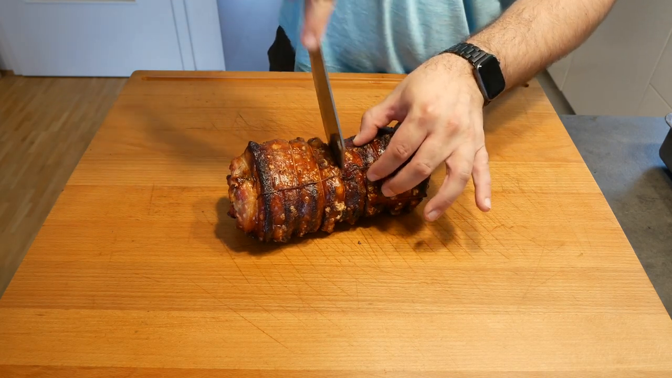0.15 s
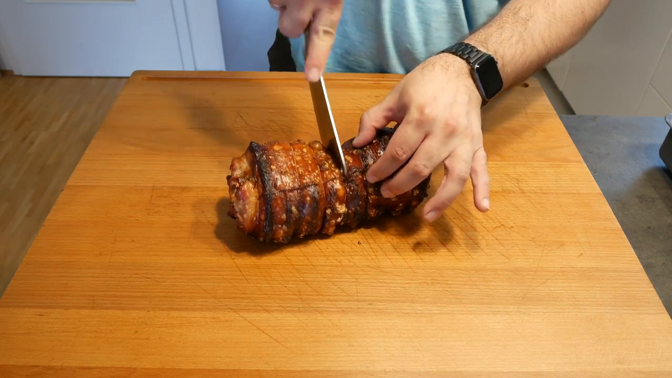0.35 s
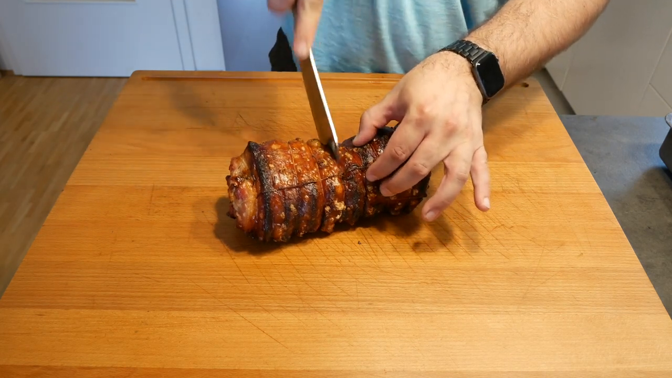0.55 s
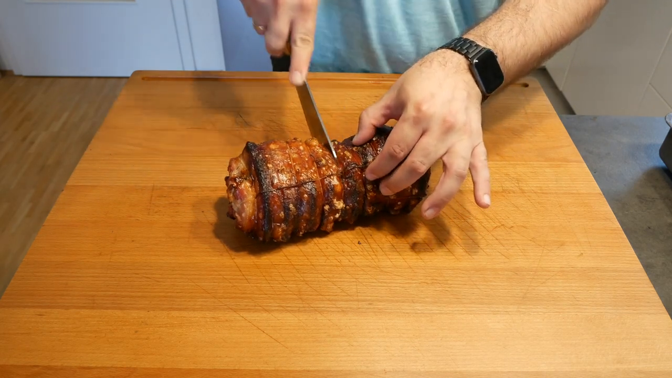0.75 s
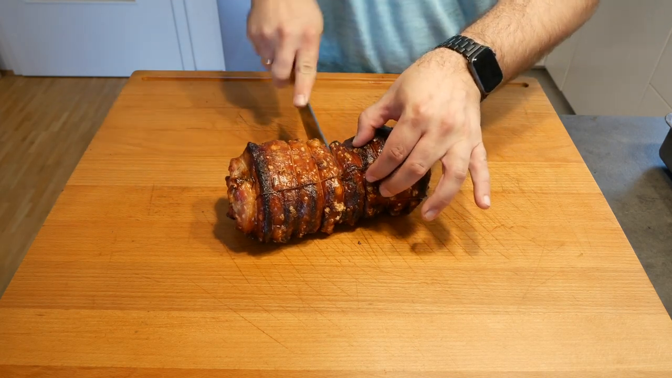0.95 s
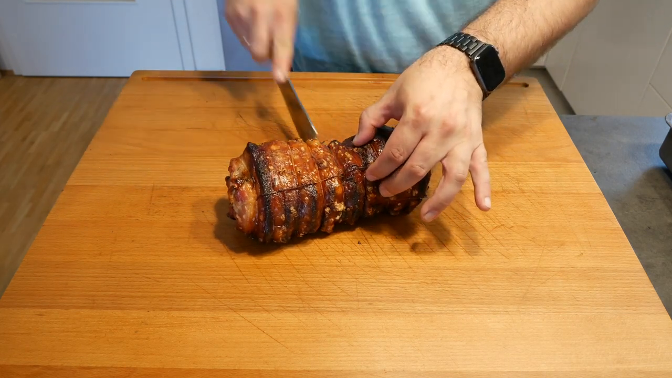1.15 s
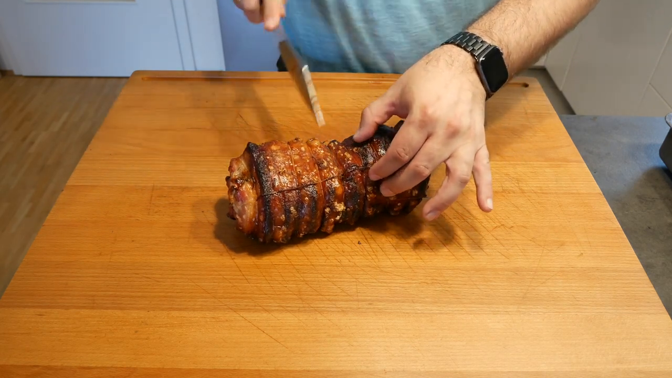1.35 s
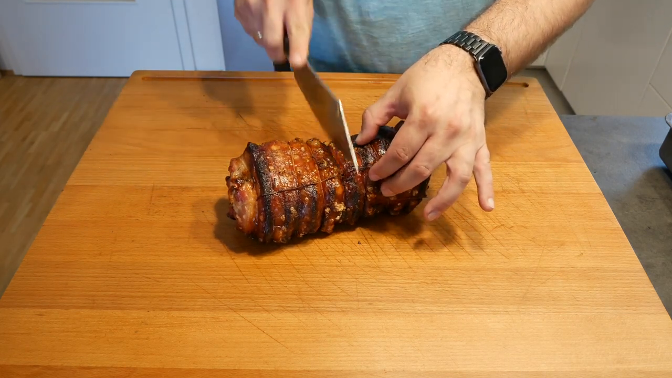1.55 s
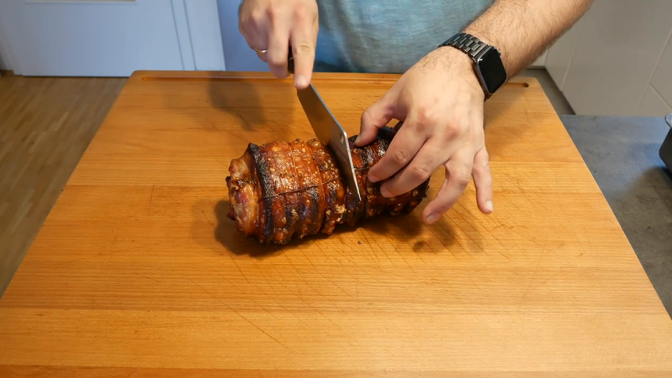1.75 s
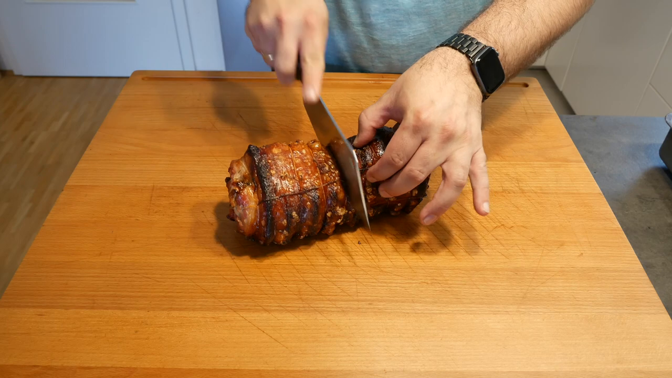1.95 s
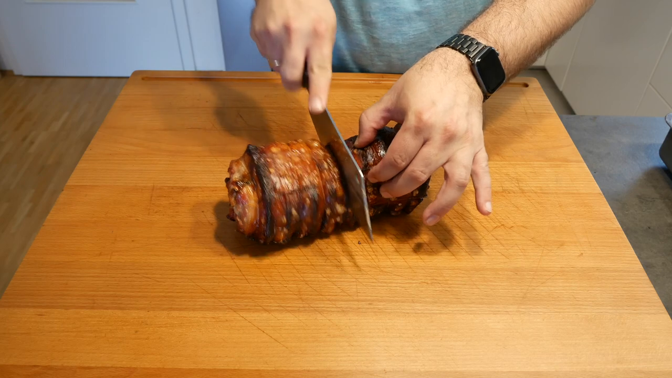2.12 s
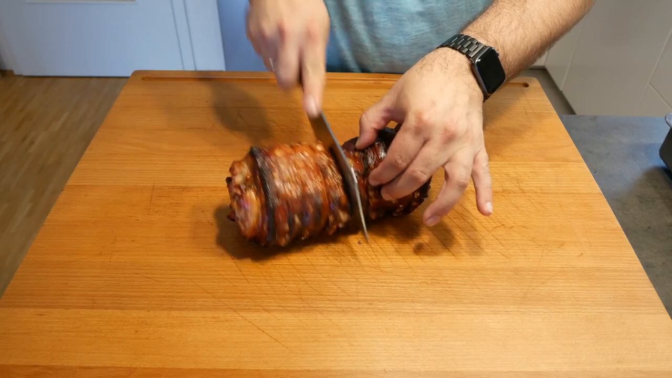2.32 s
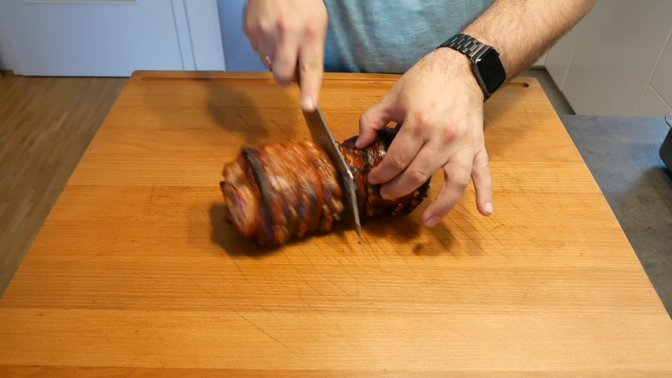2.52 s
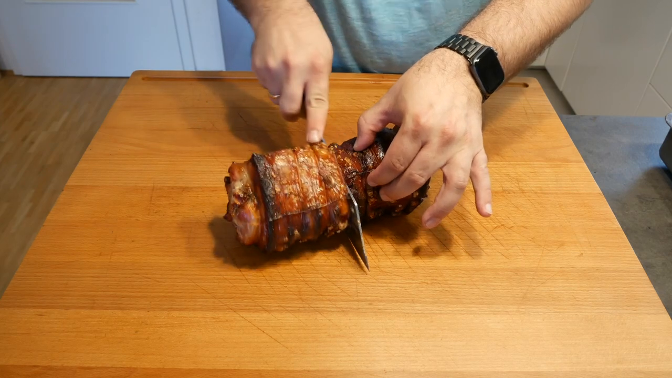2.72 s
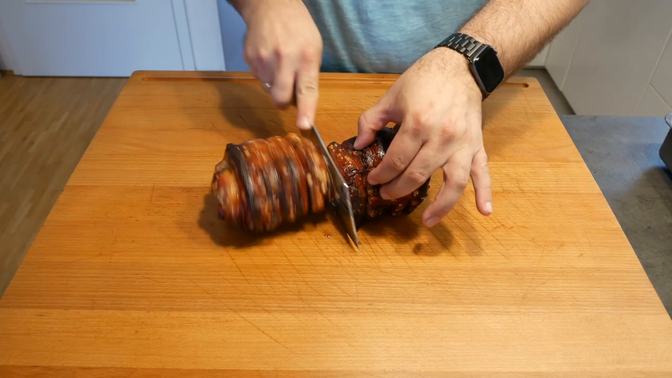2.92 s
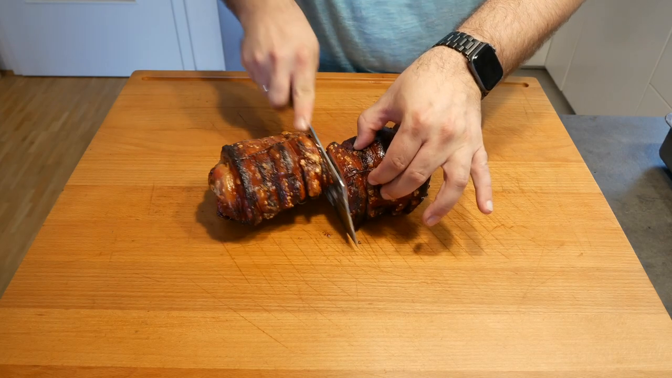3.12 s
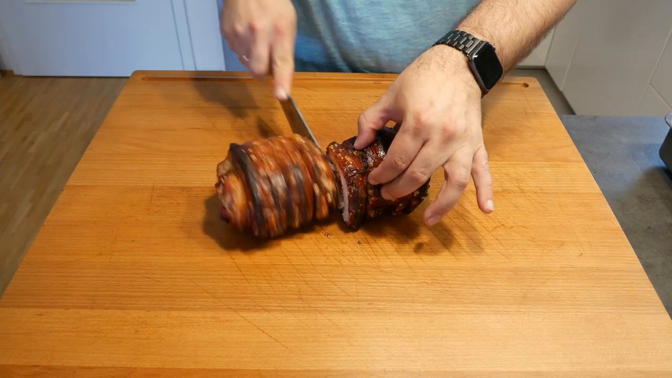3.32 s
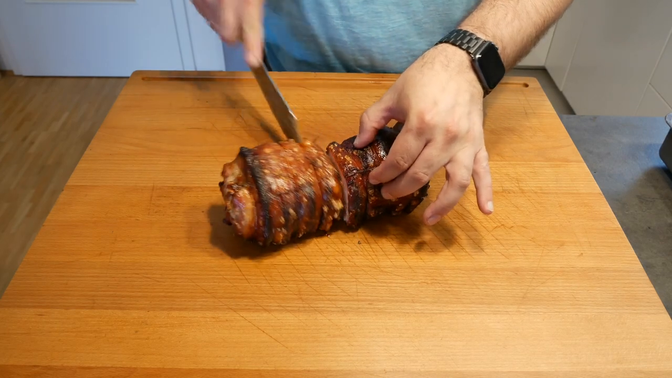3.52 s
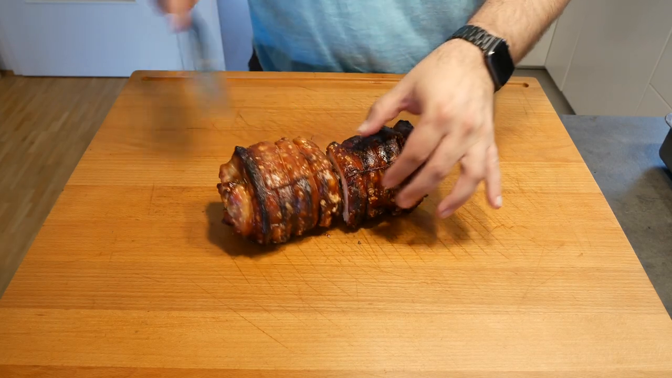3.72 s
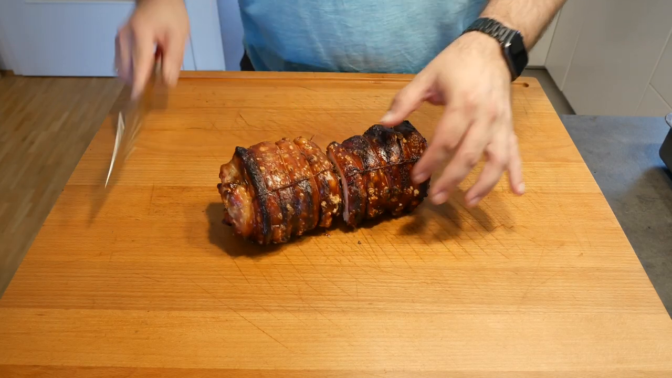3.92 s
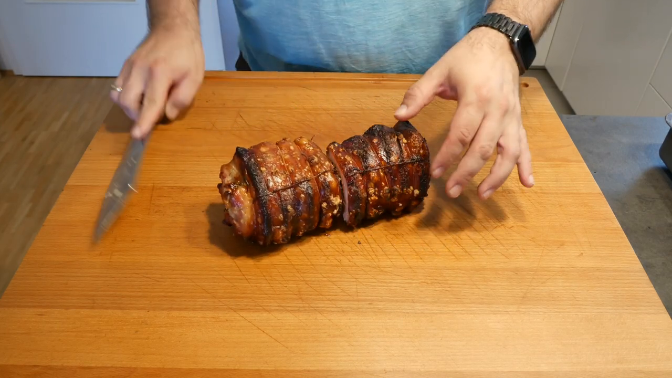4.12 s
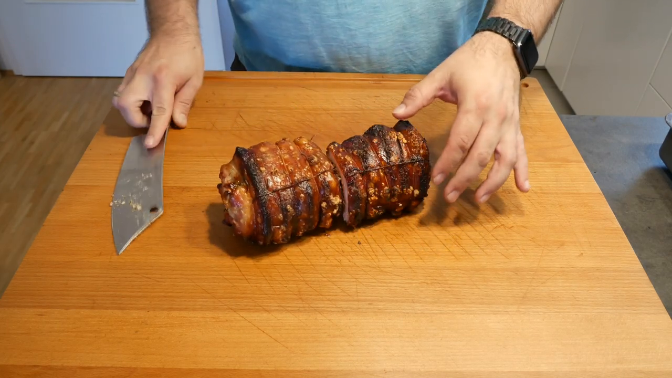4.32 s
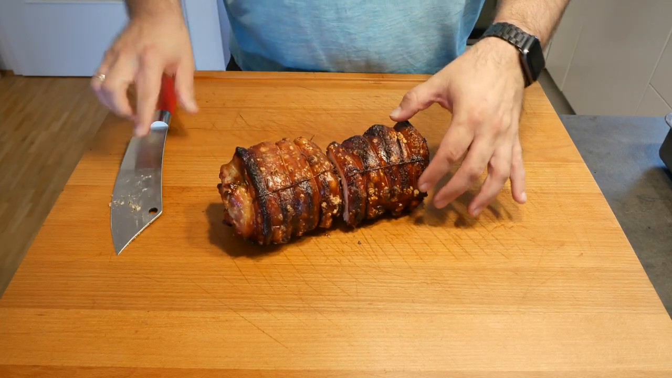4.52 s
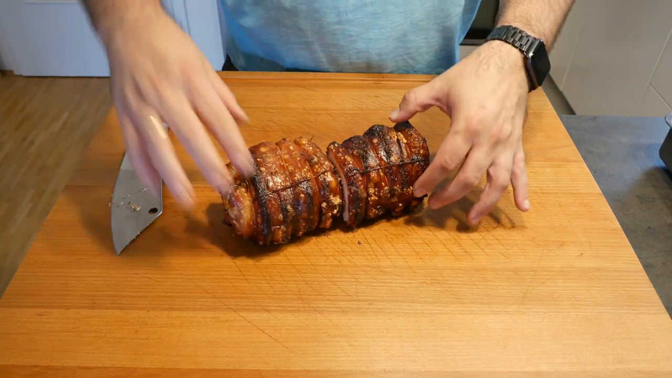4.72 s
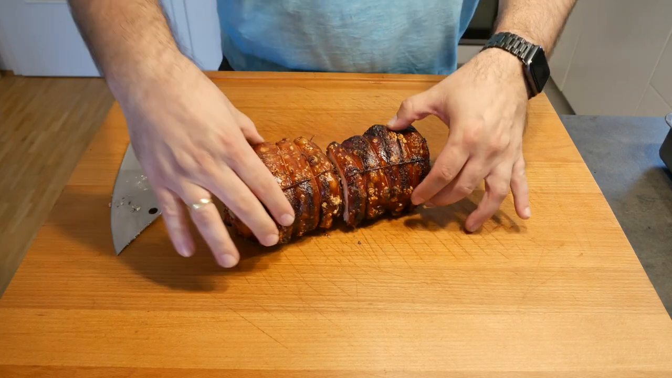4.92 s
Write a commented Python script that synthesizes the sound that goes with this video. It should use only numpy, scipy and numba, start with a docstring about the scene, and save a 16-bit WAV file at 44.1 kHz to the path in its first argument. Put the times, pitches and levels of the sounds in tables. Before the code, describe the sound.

Uneven sawing strokes crackle through a hard crust, ending in heavy thuds on a wooden cutting board; a smooth wet slide follows the first burst, and another, longer one follows the second. Faint steel ticks and hand rustling lead to a double-edged clack of handle and blade on wood, then a tiny tick. Close microphones, a small room's short echo, low steady room noise and a barely audible hum.

```python
"""A large knife saws through a crisp-skinned roast on a thick wooden board, close to the microphones in a kitchen.
Swarms of random tiny fractures make the crust rasp, crunch and crack; dense slips drag the blade through the meat.
Decaying modes with a gritty contact make the blade thump on the board, and near the end knock the knife down flat.
Behind them the steel sings and ticks, hands rustle, the table shudders, and quiet room noise carries a faint hum.
"""
import sys
import numpy as np
from scipy import signal
from scipy.fft import rfft, irfft, next_fast_len
from scipy.io import wavfile
from numba import njit

SR = 44100
rng = np.random.default_rng(int(sys.argv[2]) if len(sys.argv) > 2 else 0)


def materialize(psi):
    """Save the field psi as 16-bit PCM at rate SR to the path in sys.argv[1].

    A 1-D psi becomes a single channel; in a 2-D psi each row is a channel.
    """
    bounded = np.clip(np.atleast_2d(psi).T, -1, 1)
    quanta = np.round(bounded * 32767).astype(np.int16)
    wavfile.write(sys.argv[1], SR, quanta)


N = 223066  # samples
T = np.arange(N) / SR  # seconds

# In the stroke tables level_db holds at mid-stroke and swell_db is the rise from start to end of the stroke.
# For rasps, crunches and draws it is the level of the scratch range before the trim of the layer,
# and brightness_db is scaled to lower the rub and lift the fizz.
# the edge scratches over the crust: start_s, length_s, level_db, swell_db, brightness_db
RASP_STROKES = [(0.0, 0.17, -53.5, -14, -3.5), (0.315, 0.19, -58.5, -10, 3), (0.523, 0.088, -49.5, 12, -4),
                (0.674, 0.2, -60.5, 23, -5), (1.56, .22, -59.5, 3, -3), (1.807, 0.17, -52.5, -2.5, -3),
                (2.044, 0.31, -55.5, 4, -3), (2.343, 0.13, -47, 2, -6.5)]
# the edge breaks through the crust: start_s, length_s, level_db, swell_db, brightness_db
CRUNCH_STROKES = [(0.196, 0.11, -42.5, 12, -1), (2.257, 0.085, -38, 10.5, -1.5),
                  (2.556, 0.03, -37.5, 5, -3.5), (2.609, 0.038, -32, 7.5, -1)]
# pieces of crust snapping: start_s, level_db (over 5 ms), crumble_s, tilt_db (per octave)
CRACKS = [(0.2035, -46.5, 0.0053, -13), (0.2886, -37, 0.0025, -2), (0.5414, -39.5, 0.0055, 1),
          (0.576, -34.5, 0.0071, 0), (0.602, -18.5, 0.0077, -7.5), (0.837, -41.5, 0.0057, -2),
          (1.673, -48.5, .002, -1), (1.7136, -41, 0.035, -3), (1.8088, -35.5, 0.00044, 4),
          (2.2262, -39.5, 0.0011, -3), (2.2702, -34, 0.0034, 1), (2.2843, -32, 0.00078, 1.5),
          (2.2902, -24.5, 0.0036, 1), (2.3029, -24.5, 0.0048, -2.5), (2.3135, -29.5, 0.0092, -1),
          (2.3299, -25, 0.00076, 2.5), (2.3428, -20.5, 0.0006, -5), (2.351, -30, 0.0015, 6),
          (2.5699, -25.5, 0.00025, 2.5), (2.5798, -26, 0.0007, 4), (2.5973, -28, 0.0037, 1),
          (2.602, -18.5, 0.0054, 1), (2.636, -32, 0.0017, 1), (2.64, -29, 0.0066, 0.5),
          (2.648, -15, 0.0016, -7), (3.015, -48, .002, 8.5)]
# spectrum of the breaking crust: freq_hz, level_db
CRUST_SPECTRUM = [(100, -4), (230, -24), (330, 7), (480, -0.5), (620, 7.5), (900, 5.5), (1400, 2.5),
                  (2200, -1), (3400, 0), (5200, -3), (8000, -1.5), (11000, -4), (15000, -5.5)]

# the blade slides through the meat: start_s, length_s, level_db, swell_db, brightness_db
DRAW_STROKES = [(0.91, 0.21, -47, 7, 2), (2.717, 0.11, -48, 3, -2), (2.857, 0.085, -52, 7, -3.5),
                (3.009, .52, -46.5, 1.5, 0.5)]
DRAW_ATTACK_S, DRAW_RELEASE_S = 0.039, 0.027
# resonances of the gripped blade, before they waver and climb: centre_hz, width_hz, level_db
SQUEAKS = [(372, 31, 3), (900, 110, 4.5), (1026, 35, 1.5), (1511, 22, 5), (2114, 150, -5), (2640, 70, -7),
           (3360, 100, -6.5), (4200, 490, -12), (5500, 390, -18), (6460, 67, -7), (7670, 280, -20),
           (10100, 600, -33)]
# spectrum of moist meat rubbing on the blade: freq_hz, level_db
MEAT_SPECTRUM = [(150, -40), (280, 0), (390, 13), (520, -14), (850, -0.5), (1100, 0.5), (1400, -4),
                 (2100, -5), (2800, -6), (3600, 2), (4600, -20.5), (6800, -11), (10000, -13), (12000, -11),
                 (15000, -16.5)]

# blade driven down on the board: start_s, nominal_peak_db, hardness_hz (low-pass of the contact),
# upper_db (modes above 500 Hz, and grit), shudder_db (peak of the table)
THUMPS = [(0.2957, -10, 1310, 0, -34), (0.5996, -9, 1700, -18, -37.5), (0.612, -13.5, 1770, 9, -74),
          (0.8387, -2.5, 1240, 4.5, -44), (1.843, -36, 500, 9, -60), (1.883, -38, 1500, 8, -62),
          (2.2267, -28, 1300, 0.5, -42.5), (2.5437, -19.5, 1400, 5.5, -41.5), (2.651, 0, 1270, 7, -45)]
# modes of the board under the roast: freq_hz, level_db, t60_s
BOARD_MODES = [(164, -18, 0.061), (255, -23, 0.054), (295, -1.5, 0.046), (360, 11.5, 0.05),
               (443, -10.5, 0.054), (559, -5, 0.032), (622, 1.5, .025), (672, -5.5, 0.044),
               (779, -0.5, 0.048), (862, 1, 0.026), (1108, -1, 0.043), (1240, -9.5, 0.073),
               (1512, -14.5, 0.042), (2050, -14, 0.012), (3300, -8, 0.019)]
# spectrum of the rough contact of a blow on wood: freq_hz, level_db
WOOD_GRIT = [(60, -29), (220, -58), (350, -14.5), (700, 5), (1200, -24), (1500, -10), (3000, -12),
             (12000, -11)]

# the knife lands handle first, then the blade slaps flat: start_s, nominal_peak_db, hardness_hz, upper_db
KNOCKS = [(4.2879, 2.5, 2080, -2.5), (4.2902, -8, 13300, -2)]
# modes of the knife lying on the wood: freq_hz, level_db, t60_s
KNIFE_MODES = [(154.3, -31, 0.82), (310, -2, 0.031), (585, -2.5, 0.071), (692, 5.5, 0.029),
               (880, 7.5, 0.013), (1356, -7, 0.078), (1700, -12, 0.0083), (1410, 0, 0.032),
               (2030, 2.5, 0.026), (2795, -13, 0.053), (2100, -7, .03), (3350, -11, .05), (3540, -7, 0.045),
               (4835, -15, .2), (5850, -16, .04), (6270, -13.5, .21), (7225, -12.5, .14), (4620, -5, 0.026),
               (7600, 8, 0.03), (8870, -8, 0.03), (9750, -9, 0.063), (10600, -18.5, 0.023),
               (13000, -20, .04)]
# spectrum of the rough contact of steel on wood: freq_hz, level_db
STEEL_GRIT = [(50, -13), (130, -7), (400, 7), (800, -30.5), (1100, -2), (1700, -34), (2500, -5.5),
              (3400, -1.5), (8000, 6.5), (11000, -3.5), (15000, -0.5)]

# scraping makes the steel sing: start_s, length_s, level_db, swell_db
SING_STROKES = [(1.59, 0.075, -61, -8), (2.08, 0.08, -54.5, 11), (3.42, 0.135, -57.5, 16)]
# modes of the free blade: freq_hz, level_db, t60_s
STEEL_MODES = [(6400, -15, 1), (7150, 3.5, 0.021), (7840, -9.5, 0.45), (9950, -3, 0.055),
               (11300, 4.5, 0.0091), (13200, -16, .04), (14500, -9, .04)]
# light ticks that ring the steel: start_s, peak_db
TINGS = [(1.5925, -39.5), (1.627, -38.5), (2.104, -33), (2.157, -39), (3.535, -38)]
# the handle settles as the hand lets go: start_s, peak_db
SETTLE = [(4.7328, -30)]
# spectrum of the handle tick: freq_hz, level_db
HANDLE_SPECTRUM = [(200, -20), (1200, -18), (2700, 0), (4500, -13), (7000, -16), (14000, -34)]

# faint rustles as the hands move away: start_s, length_s, level_db, swell_db
RUSTLE_STROKES = [(3.55, 0.095, -55.5, -2), (3.69, 0.098, -56.5, -7), (3.85, 0.052, -54, -5),
                  (4.02, 0.1, -58, -13), (4.66, 0.11, -52.5, 5)]
# spectrum of the rustles: freq_hz, level_db
RUSTLE_SPECTRUM = [(200, 3.5), (700, 4), (1300, 4), (2000, -8), (3400, -23), (4500, -35), (14000, -33)]

# the roast rocks and the hand leans on the table: start_s, shudder_db
NUDGES = [(2.867, -45), (3.12, -60), (3.331, -55), (4.621, -50)]
# modes of the table under the board: freq_hz, level_db, t60_s
TABLE_MODES = [(41.7, -2.5, 1), (59.6, -1.5, 1), (83, -1.5, .3), (96.1, 4, 0.45), (123.4, -5.5, 0.6)]
SWAY_RISE_S = 0.02

# diffuse echo of the kitchen in overlapping bands: centre_hz, echo_db, t60_s
ROOM_ECHO = [(98, 6, 0.13), (318, -5.5, 0.5), (880, -13, 0.76), (1990, -3.5, 0.67), (4960, -3, 0.59),
             (9100, -9, 0.41), (15500, -15, 0.25)]
# spectrum of the room noise: freq_hz, level_db
AIR_SPECTRUM = [(15, -119), (25, 1), (123, -8), (185, -3), (223, -6.5), (285, -5), (384, -9.5), (575, -7.5),
                (624, -12.5), (1230, -10), (1940, -20.5), (3340, -16), (3920, -21.5), (9070, -27),
                (16000, -35.5)]
AIR_DB = -55
# faint appliance hum: pitch_hz, amplitude_db
HUM = [(60, -79), (287, -65.5), (872, -63.5)]

CHANNEL_LAG = 0.02  # samples between left and right
HISS_DB, TOP_HZ = -78.5, 16000


def amp(db):
    """Decibels to gain."""
    return 10 ** (np.asarray(db) / 20)


def add(track, s, sound):
    """Mix a sound into the track at a time in seconds."""
    i = max(int(s * SR), 0)
    track[i:i + len(sound)] += sound[:N - i]


def peak(x, db):
    """Scale to a peak level."""
    return x * amp(db) / np.abs(x).max()


def rms(x):
    """Root mean square."""
    return np.sqrt(np.mean(x ** 2))


def band(x, lo_hz, hi_hz, order=3):
    """Band-pass."""
    edges_hz = [lo_hz, min(hi_hz, SR / 2 - 1)]
    return signal.sosfilt(signal.butter(order, edges_hz, "band", fs=SR, output="sos"), x)


def colour(x, points, tilt_db=0):
    """Minimum-phase filter through freq_hz, level_db points, tilted per octave around 3 kHz."""
    size = 2 * next_fast_len(len(x) // 2 + 1)
    octave = np.log2(np.fft.rfftfreq(size, 1 / SR) + 1)
    hz, db = np.transpose(points)
    # the tilt stays level from two octaves below its pivot
    gain_db = np.interp(octave, np.log2(hz), db) + tilt_db * np.maximum(octave - np.log2(3000), -2)
    # folding the cepstrum makes the filter causal
    cepstrum = irfft(np.log(amp(gain_db)))
    cepstrum[1:size // 2] *= 2
    cepstrum[size // 2 + 1:] = 0
    return irfft(rfft(x, size) * np.exp(rfft(cepstrum)))[:len(x)]


def walk(rate):
    """Random wander in straight lines between knots of spread 1, at a rate in knots per second."""
    knots = np.arange(int(N / SR * rate) + 2)
    return np.interp(T, knots / rate, rng.standard_normal(len(knots)))


def fractures(size, rate, spread_db):
    """Random tiny breaks at a rate per second, most of them weak and a few strong."""
    strength = amp(spread_db * np.minimum(rng.standard_normal(size), 2.5))
    happens = rng.random(size) < rate / SR
    return happens * strength * rng.choice([-1, 1], size)


def gain(strokes, attack_s, release_s, bright=0, drift_db=0):
    """Each stroke rises, swells evenly in dB and dies away; brightness and drift alter its level."""
    out = np.zeros(N)
    for start, length, db, swell_db, *bright_db in strokes:
        t = T - start
        along = np.clip(t / length, 0, 1) - .5
        shape = np.clip(t / attack_s, 0, 1) * np.exp(-np.maximum(t - length, 0) / release_s)
        out += shape * amp(db + bright * sum(bright_db) + (swell_db + drift_db) * along)
    return out


def friction(grains, strokes, attack_s, release_s, rub_db, fizz_db, rub_drift_db=0, fizz_drift_db=0):
    """Strokes play grains in three ranges, rub, scratch and fizz; a bright stroke trades rub for fizz."""
    rub, scratch, fizz = band(grains, 150, 2300), band(grains, 2300, 7500), band(grains, 7500, 17000)
    rub_gain = amp(rub_db) * gain(strokes, attack_s, release_s, -1.4, rub_drift_db)
    scratch_gain = gain(strokes, attack_s, release_s)
    fizz_gain = amp(fizz_db) * gain(strokes, attack_s, release_s, 0.47, fizz_drift_db)
    return rub / rms(rub) * rub_gain + scratch / rms(scratch) * scratch_gain + fizz / rms(fizz) * fizz_gain


def ring(modes, seconds):
    """Exponentially decaying modes after one tap, starting at full swing."""
    t = T[:int(seconds * SR)]
    return sum(amp(db - 60 * t / t60) * np.cos(2 * np.pi * hz * t) for hz, db, t60 in modes)


def blow(modes, hard_hz, grit, grit_db, grit_t60, upper_db=0):
    """One blow: modes and a gritty contact; a softer contact takes the treble away."""
    t = T[:SR // 2]
    # the place of the blow decides how much the modes above the lowest bends take up
    modes = [(hz, db + upper_db * (hz > 500), t60) for hz, db, t60 in modes]
    # neighbouring modes swing in opposite directions
    body = ring(modes[::2], .5) - ring(modes[1::2], .5)
    rough = colour(amp(-60 * t / grit_t60) * rng.standard_normal(len(t)), grit)
    sound = body / rms(body) + amp(min(grit_db + upper_db, 0)) * rough / rms(rough)
    return signal.sosfilt(signal.butter(2, min(hard_hz, SR / 3), fs=SR, output="sos"), sound)


def hits(events, modes, grit, grit_db, grit_t60, crest_db):
    """Blows on one object; the crest sets the first 10 ms below the nominal peak."""
    out = np.zeros(N)
    for s, db, hard_hz, upper_db, *_ in events:
        sound = blow(modes, hard_hz, grit, grit_db, grit_t60, upper_db)
        add(out, s, sound * amp(db - crest_db) / rms(sound[:SR // 100]))
    return out


@njit
def resonance(x, hz, width):
    """State-variable band-pass with a moving centre and a width in Hz."""
    y, band_state, low_state = np.empty(len(x)), 0., 0.
    for i in range(len(x)):
        g, damping = np.tan(np.pi * hz[i] / SR), width / hz[i]
        v = (band_state + g * (x[i] - low_state)) / (1 + g * (g + damping))
        band_state = 2 * v - band_state
        low_state = low_state + 2 * g * v
        y[i] = damping * v
    return y


def crust(rate, spread_db, catch_db, tilt_db):
    """The edge catches and slips on blistered skin, setting off swarms of fractures."""
    catches = amp(catch_db * walk(180))
    return colour(fractures(N, rate, spread_db) * catches, CRUST_SPECTRUM, tilt_db)


def rasp(trim_db=-2):
    """Light strokes scratch the surface of the crust in dense small fractures."""
    grains = crust(rate=9300, spread_db=3.5, catch_db=2.0, tilt_db=0.1)
    return amp(trim_db) * friction(grains, RASP_STROKES, attack_s=0.004, release_s=0.03, rub_db=-5, fizz_db=-2.5)


def crunch(trim_db=-1):
    """Heavy strokes break the crust in sparser, more uneven fractures and stop short."""
    grains = crust(rate=5000, spread_db=4.5, catch_db=2.5, tilt_db=-1.3)
    return amp(trim_db) * friction(grains, CRUNCH_STROKES, attack_s=0.0055, release_s=0.011,
                                   rub_db=-1.5, fizz_db=-2.5)


def cracks(rate=9000, spread_db=5, first=0.33):
    """A piece snaps, then crumbles in a fading avalanche of smaller breaks."""
    out, t = np.zeros(N), T[:SR // 16]
    for s, level_db, crumble_s, tilt_db in CRACKS:
        breaks = fractures(len(t), rate, spread_db) * np.exp(-t / max(crumble_s, 1 / SR))
        breaks[0] += first
        snap = colour(breaks, CRUST_SPECTRUM, tilt_db)
        level_5ms = np.sqrt(np.sum(snap ** 2) / (SR // 200))
        add(out, s, snap * amp(level_db) / level_5ms)
    return out


def draw(trim_db=-1, smear_db=-10, rise=0.35, wander=0.045, return_s=.0016, return_db=-8):
    """Moist meat drags on the blade in dense slips that ring its wavering, climbing resonances."""
    slips = fractures(N, rate=6000, spread_db=3) * amp(1.3 * walk(60))
    pull_s = np.zeros(N)  # time along the stroke, zero at its middle
    for start, length, *_ in DRAW_STROKES:
        pull_s = np.where(T >= start, np.minimum(T - start, length) - length / 2, pull_s)
    climb = 2 ** (rise * pull_s)  # rise in octaves a second
    # each slip also comes back from the end of the blade, sooner as it is pulled out
    lag_s = return_s / climb * (1 + .035 * walk(18))
    slips = slips + amp(return_db) * np.interp(T - lag_s, T, slips)
    squeak = 0
    for hz, width, mode_db in SQUEAKS:
        centre_hz = hz * climb * (1 + wander * walk(9.2))
        squeak = squeak + amp(mode_db + 2 * walk(14)) * resonance(slips, centre_hz, float(width))
    grains = squeak + amp(smear_db) * colour(slips, MEAT_SPECTRUM)
    # the sound thins along the stroke: rub falls while fizz rises
    return amp(trim_db) * friction(grains, DRAW_STROKES, DRAW_ATTACK_S, DRAW_RELEASE_S, rub_db=6, fizz_db=-8.5,
                                   rub_drift_db=-9, fizz_drift_db=4)


def thumps():
    """The blade drives down on the board, whose short wooden modes ring behind a rough contact."""
    return hits(THUMPS, BOARD_MODES, WOOD_GRIT, grit_db=-10.5, grit_t60=0.047, crest_db=10)


def knocks():
    """Handle, then blade, strike the wood and set the modes of the lying knife ringing."""
    return hits(KNOCKS, KNIFE_MODES, STEEL_GRIT, grit_db=5, grit_t60=0.02, crest_db=12.5)


def sing():
    """Light, uneven scraping keeps the free part of the blade ringing."""
    tone = signal.fftconvolve(fractures(N, rate=9000, spread_db=0), ring(STEEL_MODES, 0.45))[:N]
    tone = tone * amp(5.3 * walk(120))
    return tone / rms(tone) * gain(SING_STROKES, attack_s=.012, release_s=0.0051)


def ticks():
    """Hard bits of crust ping the blade; the handle drops the last hair onto the wood."""
    out, t = np.zeros(N), T[:SR // 20]
    for s, db in TINGS:
        ping = blow(STEEL_MODES, hard_hz=14000, grit=STEEL_GRIT, grit_db=3.0, grit_t60=0.1)
        add(out, s, peak(ping, db))
    for s, db in SETTLE:
        burst = rng.standard_normal(len(t)) * np.exp(-t / .0005)
        add(out, s, peak(colour(burst, HANDLE_SPECTRUM), db))
    return out


def rustle():
    """Soft, uneven brushing of hands and sleeves, made of dense tiny contacts."""
    grains = colour(fractures(N, rate=12000, spread_db=2), RUSTLE_SPECTRUM) * amp(2 * walk(50))
    return grains / rms(grains) * gain(RUSTLE_STROKES, attack_s=0.035, release_s=0.036)


def shudder(knock_db=-35):
    """Blows and nudges set the low table modes swaying; the sway builds up late and lingers."""
    out, sway = np.zeros(N), ring(TABLE_MODES, 1)
    sway = sway * (1 - np.exp(-T[:len(sway)] / SWAY_RISE_S))
    for s, *_, db in THUMPS + NUDGES + [(KNOCKS[0][0], knock_db)]:
        add(out, s, peak(sway, db))
    return out


def wall(x, delay_s=0.035, db=-19):
    """One dull early echo from the nearest wall."""
    return x + amp(db) * np.interp(T - delay_s, T, band(x, 100, 2500, order=1), left=0)


def kitchen(x, db, delay_s=0.0046, build_s=0.0016):
    """Diffuse room echo that swells after the first walls, each band with its own decay."""
    t = T[:SR]
    octave = np.log2(np.fft.rfftfreq(SR, 1 / SR) + 1)
    noise = rfft(rng.standard_normal(SR))
    centres = np.log2([row[0] for row in ROOM_ECHO])
    onset, echo = np.clip((t - delay_s) / build_s, 0, 1), 0
    for share, (_, echo_db, t60) in zip(np.eye(len(ROOM_ECHO)), ROOM_ECHO):
        decay = onset * amp(-60 * t / t60)
        band_noise = irfft(noise * np.interp(octave, centres, share), SR)
        echo = echo + band_noise * decay * amp(echo_db) / np.linalg.norm(decay)
    return x + amp(db) * signal.fftconvolve(x, echo)[:N]


def air():
    """Quiet, nearly steady room noise with a faint hum of steady sines."""
    noise = colour(rng.standard_normal(N), AIR_SPECTRUM) * amp(.6 * walk(5))
    hum = sum(amp(db) * np.sin(2 * np.pi * hz * T) for hz, db in HUM)
    return noise / rms(noise) * amp(AIR_DB) + hum


def scene():
    """All sounds come from the board in front of the microphones, so the channels are nearly alike."""
    cutting = kitchen(rasp() + crunch() + cracks() + draw() + sing() + ticks(), db=-7.0)
    board = kitchen(thumps(), db=-0.5)
    knife = kitchen(wall(knocks()), db=0.5)
    mid = cutting + board + knife + rustle() + shudder() + air()
    # a tiny lag between the channels shows only in the treble
    side = CHANNEL_LAG / 2 * np.diff(mid, prepend=0)
    return np.array([mid + side, mid - side])


def record(dry):
    """Each channel adds a faint hiss; the recorder clips at full scale and cuts the top."""
    hiss = np.array([colour(rng.standard_normal(N), AIR_SPECTRUM) for _ in dry])
    wet = np.clip(dry + amp(HISS_DB) * hiss / rms(hiss), -1, 1)
    return signal.sosfilt(signal.ellip(8, .2, 70, TOP_HZ, fs=SR, output="sos"), wet)


dry = scene()
out = record(dry)
materialize(out)
```